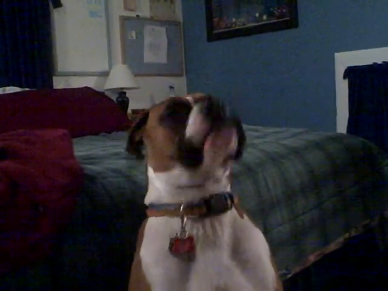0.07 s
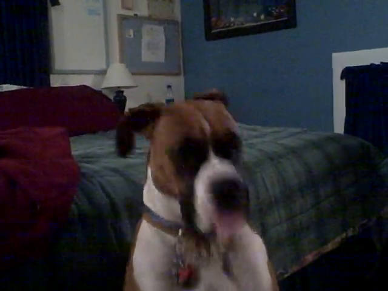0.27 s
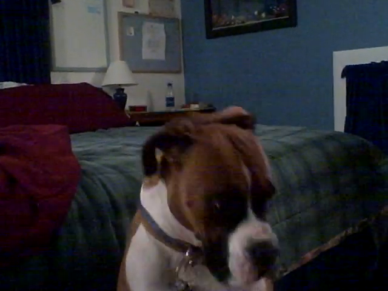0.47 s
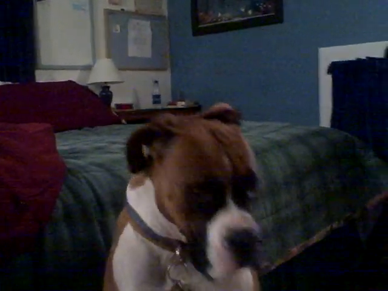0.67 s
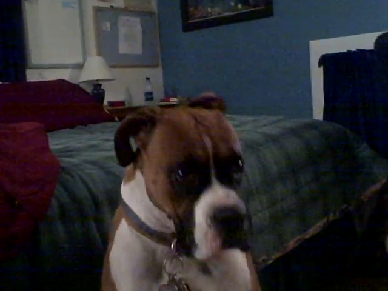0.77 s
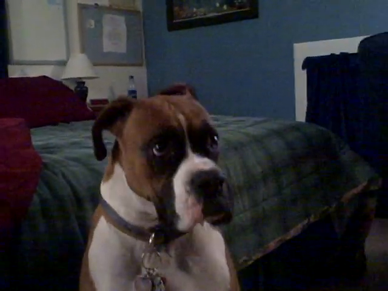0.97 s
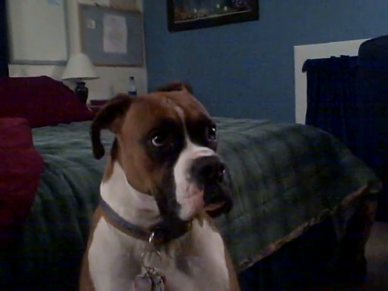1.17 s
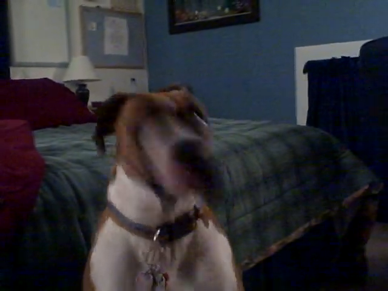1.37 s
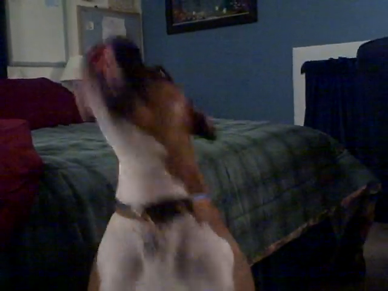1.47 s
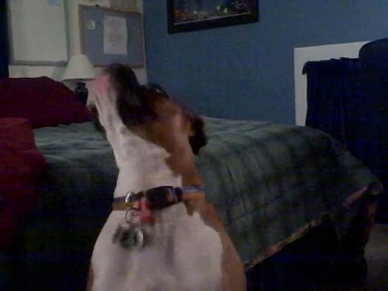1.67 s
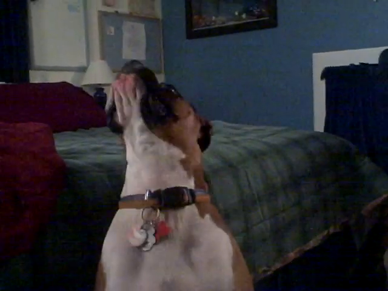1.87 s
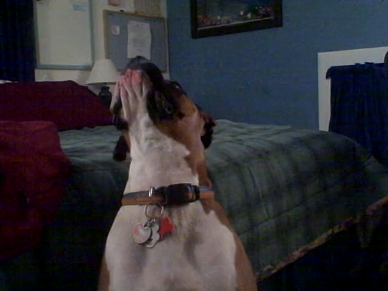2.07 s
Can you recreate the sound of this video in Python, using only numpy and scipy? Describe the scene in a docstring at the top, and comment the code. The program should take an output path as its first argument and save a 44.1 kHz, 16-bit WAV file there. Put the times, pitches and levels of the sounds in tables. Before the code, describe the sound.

Dog collar tags clink in loose scattered ticks, nearly stop, then jangle densely in a quiet bedroom.

```python
"""Dog-collar tags in a quiet bedroom

Thin metal tags on a dog's collar tick against each other and ring briefly, loosely at first, then,
after a near pause, in a dense jangle. Ticks are short tone pairs with grit; rings are decaying modes, each
soon choked. A fine rattle and dull knocks of collar and body lie beneath, with a short room echo.
A small camera hears room tone and mains hum and adds its own faint whine; its converter
adds hiss that follows the treble, cuts the highest treble and clips the sharpest ticks."""
import sys
import numpy as np
from scipy import signal
from scipy.fft import rfft, irfft
from scipy.io import wavfile
from scipy.ndimage import uniform_filter1d

SR = 44100
rng = np.random.default_rng(int(sys.argv[2]) if len(sys.argv) > 2 else 0)


def gain_from_db(level_db):
    """Turn a decibel level (scalar or array-like) into a linear amplitude factor."""
    decades = np.asarray(level_db, float) / 20
    return 10 ** decades


def master(y):
    """Save y as 16-bit WAV."""
    cut = np.clip(np.atleast_2d(y).T, -1, 1)
    pcm = np.round(cut * 32767)  # scale
    wavfile.write(sys.argv[1], SR, pcm.astype(np.int16))


N = 93183  # length in samples

# Ring pitch of the main tag hanging free, then leaning on its neighbour: f/Hz
FACE_HZ = (6187, 6285)
ONSET_S = 0.00037  # rise time constant of ticks and rings


def ring(hz, t60, phase, length=.3):
    """One mode: a sine that decays by 60 dB in t60 seconds."""
    t = np.arange(int(length * SR)) / SR
    return np.sin(2 * np.pi * hz * t + phase) * gain_from_db(-60 * t / t60)


def choked(hz, t60, phase, free_s):
    """A mode that rings freely for free_s seconds, then is damped hard as if by another contact."""
    choke_t60_s = 0.013
    t = np.arange(int(.12 * SR)) / SR
    choke = gain_from_db(-60 * np.maximum(t - free_s, 0) / choke_t60_s)
    onset = 1 - np.exp(-t / ONSET_S)
    return ring(hz, t60, phase, .12) * choke * onset


def add(out, s, x):
    """Mix x into out at time s in seconds."""
    i = int(s * SR)
    out[i:i + len(x)] += x[:N - i]


def colour(points):
    """Noise shaped by (Hz, dB) points joined on a log-frequency axis."""
    p = np.array(points)
    hz = np.maximum(np.arange(N // 2 + 1) * SR / N, 1)
    gain = gain_from_db(np.interp(np.log(hz), np.log(p[:, 0]), p[:, 1]))
    return irfft(rfft(rng.standard_normal(N)) * gain, N)


def walk(rate):
    """Slow random wander with standard deviation 1: noise averaged twice over 1/rate seconds."""
    k = int(SR / rate)
    w = uniform_filter1d(uniform_filter1d(rng.standard_normal(N), k), k)
    return w / w.std()


def bedroom():
    """Room tone as coloured noise, hum wavering in level and phase, and a whine buzzing near mains rate."""
    # Spectrum of the room tone: f/Hz, relative level/dB
    floor = [(20, -4), (66, -6), (86, -14), (125, -8), (220, -18), (344, -22.5), (639, -26), (1560, -33.5),
             (5000, -36.5), (6300, -32.5), (7400, -37), (8300, -42)]
    # Hum partials: f/Hz, mean rms level/dB
    hum = [(59.5, -64), (120, -61)]
    # Whine partials: f/Hz
    whine_hz = (7598, 7656, 8344, 4738)
    # Whine partials before the buzz: peak level/dB
    whine_db = (-79, -81, -81, -86)
    floor_db = -65.5  # rms of the tone above 150 Hz
    buzz_hz, buzz_depth = 58.5, .4
    t = np.arange(N) / SR
    tone = colour(floor)
    high = signal.sosfilt(signal.butter(4, 150, "high", fs=SR, output="sos"), tone)
    out = tone * gain_from_db(floor_db) / high.std()
    for hz, db in hum:
        level = np.sqrt(2) * gain_from_db(db + 0.83 * walk(4))
        out = out + level * np.sin(2 * np.pi * hz * t + 0.22 * walk(5.5))
    buzz = np.exp(buzz_depth * np.cos(2 * np.pi * buzz_hz * t))
    for hz, db in zip(whine_hz, whine_db):
        out = out + gain_from_db(db) * buzz * np.sin(2 * np.pi * hz * t)
    return out


def rattle():
    """Dense tiny contacts of random pitch and size; they keep the main tag singing."""
    # Base level of the fine rattle of rings and links: t/s, level/dB
    level_curve = [(0.0, -64.5), (0.41, -67), (0.54, -72), (0.59, -68), (0.83, -69), (0.92, -79),
                   (1.29, -83), (1.44, -56), (1.57, -50.5), (1.59, -48), (1.76, -48), (1.79, -49),
                   (1.9, -61), (1.96, -74), (2.11, -86.5)]
    rate_per_s, spread_db, contact_t60_s = 900, 4, 0.012
    low_hz, high_hz = 5200, 8000
    tag_db, tag_t60_s = -19, 0.094
    out, kicks = np.zeros(N), np.zeros(N)
    t = np.arange(300) / SR
    draws = rng.random((4000, 3))
    times = np.cumsum(-np.log(draws[:, 0])) / rate_per_s  # independent random gaps
    curve = np.array(level_curve)
    boost_db = -spread_db * np.log(draws[:, 1])  # lifts each contact, by spread_db on average
    size = gain_from_db(np.interp(times, curve[:, 0], curve[:, 1]) + boost_db)
    for s, a, u in zip(times[times < N / SR - .01], size, draws[:, 2]):
        hz = low_hz + u * (high_hz - low_hz)
        add(out, s, a * np.sin(2 * np.pi * hz * t) * gain_from_db(-60 * t / contact_t60_s))
        kicks[int(s * SR)] += a
    tag = sum(ring(hz, tag_t60_s, 0) for hz in FACE_HZ)
    return out + gain_from_db(tag_db) * signal.fftconvolve(kicks, tag)[:N]


def ticks():
    """Metal on metal: a short tone, a detuned partner and bright noise grit share one fast decay."""
    # Single ticks: t/s, level/dB, colour f/Hz
    contacts = [(0.0096, -44.0, 6100), (0.0312, -36.5, 7000), (0.0355, -20, 7680), (0.043, -20, 7020),
                (0.0488, -40, 7360), (0.0551, -22, 6800), (0.0602, -18.5, 6300), (0.0653, -22, 8100),
                (0.076, -32, 6940), (0.0907, -40, 7060), (0.1155, -35.5, 6000), (0.1213, -44, 6700),
                (0.1583, -45.5, 7400.0), (0.178, -43.5, 6900.0), (0.1856, -36, 6000), (0.2233, -31, 7110),
                (0.2779, -37.5, 5730), (0.3323, -31.5, 6740), (0.3352, -26, 6970), (0.3421, -20, 6640),
                (0.3688, -39, 6340), (0.3709, -22.5, 6990), (0.3769, -30.5, 6370), (0.3801, -37.5, 7000.0),
                (0.4093, -37.5, 5755), (0.4258, -43, 6580), (0.4325, -37.0, 7100), (0.4883, -34.5, 7070),
                (0.4885, -39, 7100.0), (0.5458, -27, 6820), (0.5541, -35, 7000.0), (0.5672, -21, 6900),
                (0.5806, -33, 7285), (0.5849, -9.0, 6840), (0.5891, -13.5, 6470), (0.6433, -50, 6960),
                (0.6719, -31.5, 6300), (0.6878, -22.0, 7350), (0.6933, -24.5, 7800), (0.6968, -28, 7230),
                (0.7284, -24.5, 6650), (0.7318, -47, 6870), (0.7568, -53, 7400), (0.8074, -36, 6600),
                (0.8187, -38.5, 6300), (1.3964, -26, 5130), (1.4001, -14, 5920), (1.4031, -17, 6920),
                (1.4066, -22, 6660), (1.4055, -32, 6820), (1.4087, -8.5, 6465), (1.413, -13, 6130),
                (1.4158, -22, 5770), (1.4244, -39, 6690), (1.4724, -41, 6260), (1.4878, -30, 5540),
                (1.497, -36, 6030), (1.509, -41, 5840), (1.544, -30.5, 7740), (1.5601, -28, 6930),
                (1.562, -32, 6470), (1.5652, -36.0, 4580), (1.5875, -32.5, 5160), (1.5898, -28, 6660),
                (1.5976, -31.5, 5400.0), (1.6094, -11.5, 4645), (1.611, -23, 5290), (1.6141, -23, 6530),
                (1.6179, -22, 6460), (1.622, -24.5, 5150), (1.6358, -23.5, 6900.0), (1.6659, -28.5, 4820),
                (1.6762, -23, 7000.0), (1.6789, -24.5, 6770), (1.6885, -19, 7190), (1.6916, -23.5, 7600),
                (1.6962, -17, 6000), (1.7001, -17.5, 4585), (1.703, -10.5, 6880), (1.7068, -13.5, 6360),
                (1.7097, -12, 6310), (1.7117, -20, 7490), (1.7143, -16.5, 6500.0), (1.729, -22.5, 7220),
                (1.7332, -18, 7250), (1.7358, -19, 6300.0), (1.7393, -19.5, 6450), (1.752, -16.5, 4370),
                (1.756, -18.5, 4600), (1.7616, -15, 6670), (1.7628, -16.5, 6590), (1.7719, -21.5, 6350),
                (1.7793, -31.5, 5500.0), (1.7831, -26.5, 5680), (1.79, -15.5, 6140), (1.7966, -18.0, 6940),
                (1.8064, -11.5, 5760), (1.8076, -14.5, 6710), (1.8212, -14, 6380), (1.8242, -5.5, 7255),
                (1.8284, -19, 6770), (1.834, -18.5, 7020), (1.843, -15.5, 5230), (1.8424, -6, 6450),
                (1.852, -15, 6640), (1.8557, -17.0, 6760), (1.859, -29, 7000.0), (1.8761, -26.5, 7150),
                (1.8811, -23, 6490), (1.9065, -25.5, 6880), (1.9358, -40, 7340)]
    t60_s, grit_db, partner_db = 0.005, -3.5, -3.5
    partner_spread = 0.48  # full range of partner detuning, as a fraction of the pitch
    out, t = np.zeros(N), np.arange(600) / SR
    fade = gain_from_db(-60 * t / t60_s) * (1 - np.exp(-t / ONSET_S)) * 2
    for s, db, hz in contacts:
        partner_hz = hz * (1 + partner_spread * (rng.random() - .5))
        tone = np.sin(2 * np.pi * hz * t)
        partner = gain_from_db(partner_db) * np.sin(2 * np.pi * partner_hz * t)
        grit = gain_from_db(grit_db) * np.diff(rng.standard_normal(600), prepend=0)
        add(out, s, gain_from_db(db) * fade * (tone + partner + grit))
    return out


def rings():
    """The main tag sings in a few modes of random phase, choked after a brief free ring."""
    # Rings: t/s, free until choked/s, level/dB, face (0 hanging free, 1 leaning on its neighbour)
    strikes = [(0.0374, 0.0027, -27.5, 0), (0.043, 0.0018, -25, 0), (0.049, 0.004, -32.5, 1),
               (0.0604, 0.007, -27.0, 1), (0.0729, 0.0046, -43, 0), (0.0891, 0.012, -37, 0),
               (0.1054, 0.0052, -44.5, 1), (0.1202, 0.004, -43, 0), (0.1596, 0.0026, -38.5, 0),
               (0.303, 0.052, -45, 0), (0.3325, 0.01, -31.5, 0), (0.3423, 0.0039, -30.5, 1),
               (0.356, 0.007, -39.5, 0), (0.3628, 0.0063, -37.5, 0), (0.3687, 0.017, -38.5, 0),
               (0.3926, 0.0052, -45, 0), (0.3997, 0.0056, -43.5, 0), (0.4093, 0.0066, -40.0, 0),
               (0.4256, 0.0036, -33.5, 0), (0.4886, 0.0048, -44.5, 0), (0.58, 0.005, -27, 1),
               (0.5895, 0.005, -25.5, 1), (0.5982, 0.0059, -34.5, 1), (0.617, 0.0091, -43, 1),
               (0.6257, 0.004, -41, 1), (0.6309, 0.0168, -47.5, 1), (0.672, 0.0026, -39.5, 0),
               (0.69, 0.004, -27.5, 0), (0.6937, 0.0078, -28.5, 1), (0.728, 0.0015, -26, 0),
               (0.898, 0.02, -56.5, 1), (1.4008, 0.0047, -20.5, 1), (1.412, 0.0049, -31.5, 1),
               (1.437, 0.0035, -31.5, 0), (1.4425, 0.0083, -30.5, 0), (1.4533, 0.01, -26.5, 0),
               (1.4715, 0.0053, -29.5, 0), (1.5082, 0.0053, -32, 0), (1.5164, 0.0056, -46, 0),
               (1.588, 0.0056, -39, 0), (1.696, 0.0051, -33.5, 0), (1.7146, 0.016, -22, 0),
               (1.729, 0.0037, -29, 0), (1.7395, 0.0097, -25.5, 0), (1.7503, 0.022, -6, 0),
               (1.779, 0.0092, -22.5, 0), (1.792, 0.0026, -15.5, 0), (1.8017, 0.0051, -17, 0),
               (1.8241, 0.011, -7.5, 0), (1.8492, 0.0028, -11, 0), (1.8555, 0.0019, -20.5, 1),
               (1.8696, 0.01, -30, 0), (1.8901, 0.0065, -34, 1), (1.9101, 0.0042, -38, 0),
               (1.955, 0.012, -50.0, 0)]
    # Modes of the main tag: ratio to the ring pitch, level/dB, free t60/s
    modes = [(1, 0, .3), (1.018, -16, .05), (1.14, -24, .03)]
    out = np.zeros(N)
    for s, free_s, db, face in strikes:
        pitch_hz = FACE_HZ[int(round(face))]
        for ratio, mode_db, t60 in modes:
            phase = 2 * np.pi * rng.random()
            add(out, s, gain_from_db(db) * gain_from_db(mode_db) * choked(pitch_hz * ratio, t60, phase, free_s))
    return out


def clinks():
    """Blows set the other tags ringing, one clear mode at a time."""
    # Blows: t/s, level/dB, mode index, free until choked/s
    blows = [(0.568, -40, 0, .012), (0.579, -24, 0, 0.0046), (1.446, -43, 0, 0.025),
             (1.488, -32.5, 0, 0.0062), (1.499, -41, 0, 0.012), (1.608, -20, 1, 0.0027),
             (1.562, -44.5, 0, .03), (1.597, -52, 2, 0.0063), (1.56, -47.5, 1, 0.0056),
             (1.61, -46, 2, 0.091), (1.63, -38.5, 0, 0.014), (1.653, -47.5, 1, .015),
             (1.715, -25.5, 1, 0.026), (1.753, -26.5, 1, 0.0044), (1.773, -32.5, 0, 0.031),
             (1.804, -25.5, 1, 0.004), (1.87, -38, 0, 0.028)]
    # Modes of the other tags: f/Hz, free t60/s
    modes = [(5522, .2), (4410, .12), (3590, .3)]
    out = np.zeros(N)
    for s, db, which, free_s in blows:
        hz, t60 = modes[int(round(which))]
        add(out, s, gain_from_db(db) * choked(hz, t60, 0, free_s))
    return out


def knocks():
    """Soft knocks of collar and body: lower, duller decaying modes with a soft start."""
    # Knocks: t/s, level/dB, f/Hz, t60/s
    thumps = [(1.387, -29, 468, 0.012), (1.408, -40, 149, 0.081), (1.421, -34.5, 776, 0.079),
              (1.428, -40, 26.56, 0.4), (1.559, -47.5, 500, 0.064), (1.754, -34, 118.6, .08)]
    onset_s = 0.00071
    out, t = np.zeros(N), np.arange(int(.4 * SR)) / SR
    for s, db, hz, t60 in thumps:
        add(out, s, gain_from_db(db) * ring(hz, t60, 0, .4) * (1 - np.exp(-t / onset_s)))
    return out


def room_echo(tags):
    """Short reverberation: decaying noise of unit energy, starting 4 ms after the direct sound."""
    level_db, t60_s = -14, .22
    t = np.arange(int(.4 * SR)) / SR
    echo = rng.standard_normal(len(t)) * gain_from_db(-60 * t / t60_s) * (t > .004)
    wet = signal.fftconvolve(tags, echo / np.sqrt(np.sum(echo ** 2)))[:N]
    return gain_from_db(level_db) * wet


def scene():
    """Tags and knocks with their room echo, over the bedroom."""
    tags = rattle() + ticks() + rings() + clinks() + knocks()
    return (tags + room_echo(tags) + bedroom())[None]


def converter_hiss(dry):
    """White hiss whose level follows the rectified, smoothed treble above 2 kHz."""
    level_db, follow_s = -9, 0.00035
    k = np.exp(-1 / (follow_s * SR))
    treble = signal.sosfilt(signal.butter(2, 2000, "high", fs=SR, output="sos"), dry)
    envelope = signal.lfilter([1 - k], [1, -k], np.abs(treble))
    return gain_from_db(level_db) * envelope * rng.standard_normal(dry.shape)


def treble_cut(x):
    """The converter's steep roll-off, applied as a gain over the whole spectrum."""
    # Treble roll-off: f/Hz, gain/dB
    roll_off = [(7600, 0), (8100, -5), (8450, -10), (8800, -21), (9130, -37), (9500, -58), (9900, -80)]
    hz, db = np.array(roll_off).T
    gain = gain_from_db(np.interp(np.arange(N // 2 + 1) * SR / N, hz, db))
    return irfft(rfft(x) * gain, N)


def low_pass(x):
    """Removes everything above the highest recorded frequency."""
    return signal.sosfilt(signal.butter(12, 15800, fs=SR, output="sos"), x)


def record(dry):
    """The camera adds converter hiss, cuts the treble and clips hard."""
    clip = .67  # of full scale
    x = treble_cut(dry + converter_hiss(dry))
    return low_pass(np.clip(x, -clip, clip))


dry = scene()
out = record(dry)
master(out)
```